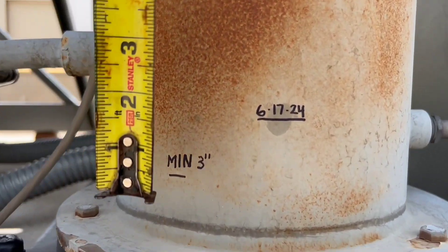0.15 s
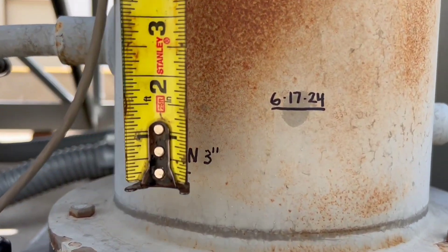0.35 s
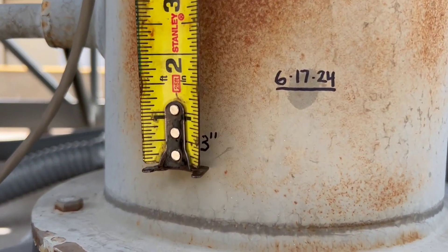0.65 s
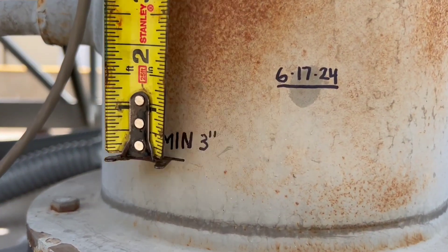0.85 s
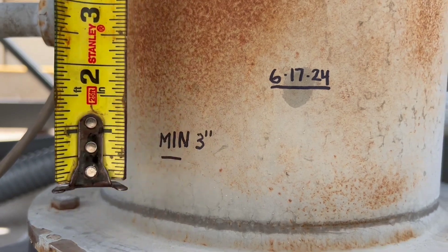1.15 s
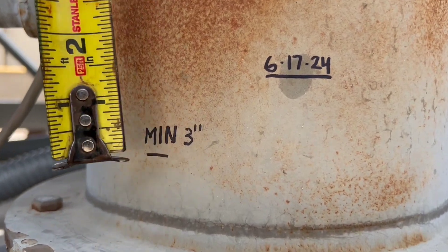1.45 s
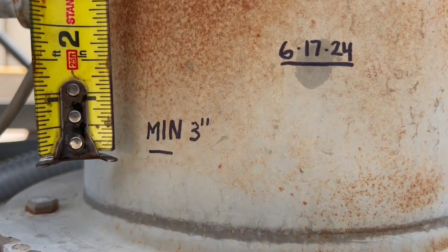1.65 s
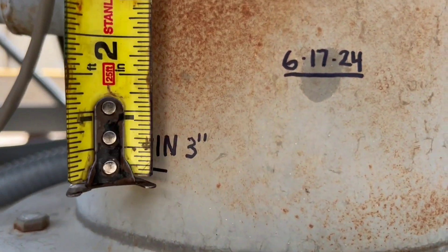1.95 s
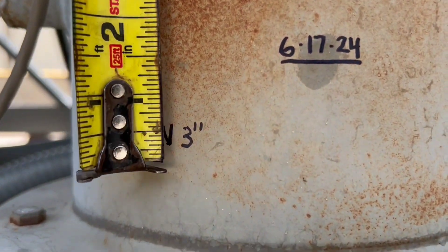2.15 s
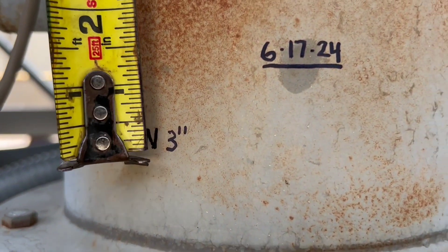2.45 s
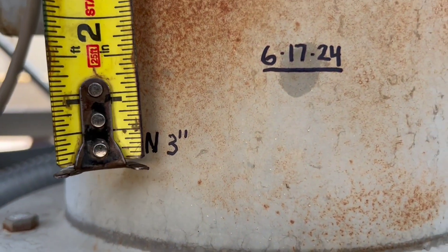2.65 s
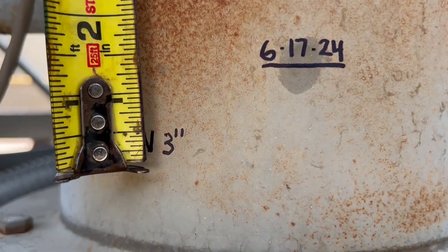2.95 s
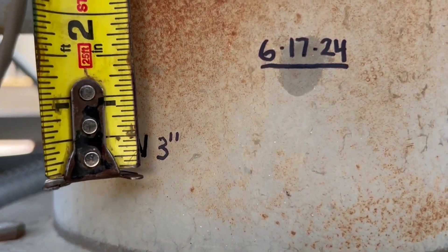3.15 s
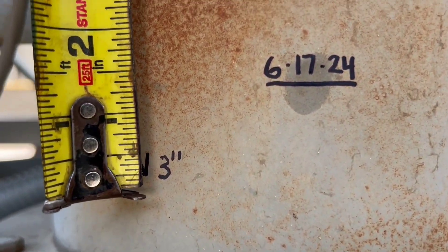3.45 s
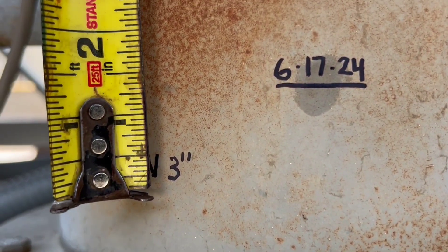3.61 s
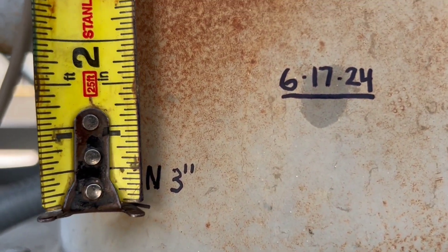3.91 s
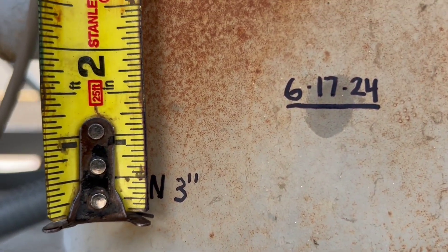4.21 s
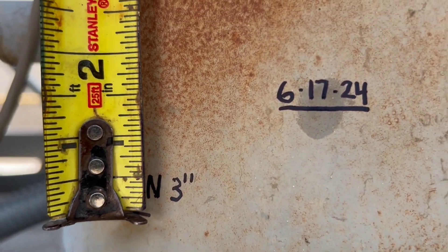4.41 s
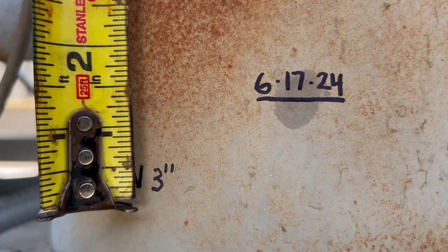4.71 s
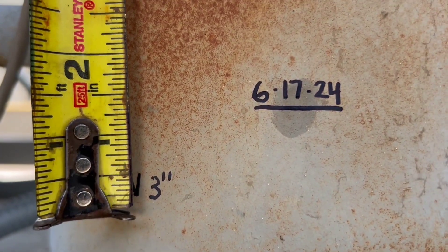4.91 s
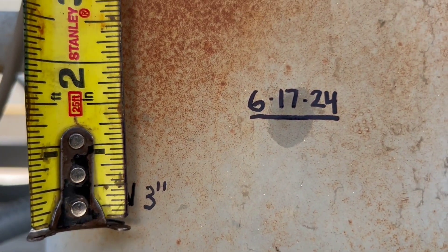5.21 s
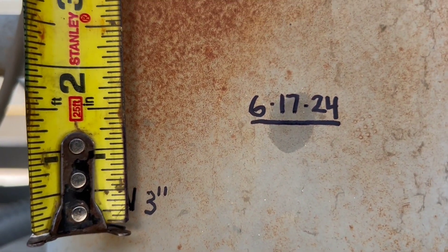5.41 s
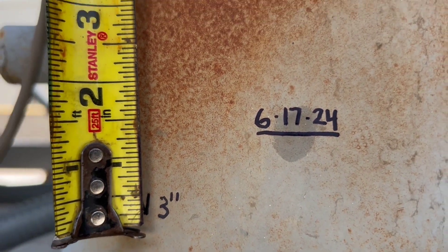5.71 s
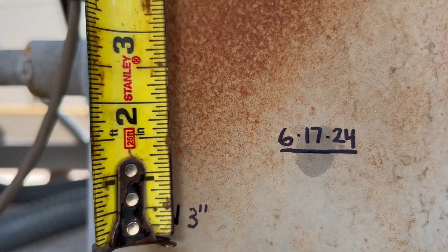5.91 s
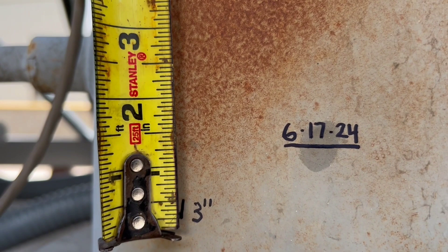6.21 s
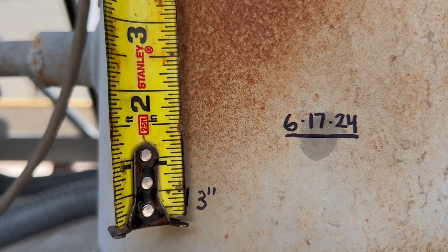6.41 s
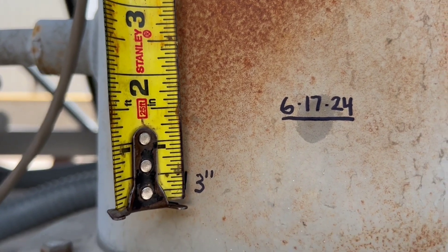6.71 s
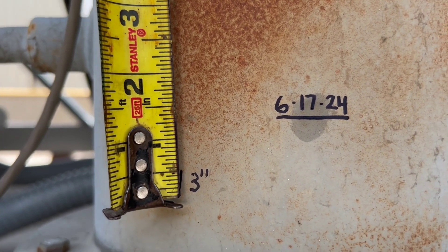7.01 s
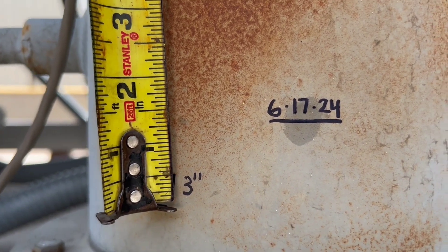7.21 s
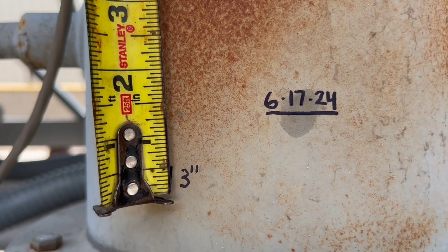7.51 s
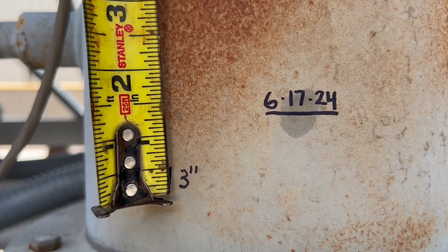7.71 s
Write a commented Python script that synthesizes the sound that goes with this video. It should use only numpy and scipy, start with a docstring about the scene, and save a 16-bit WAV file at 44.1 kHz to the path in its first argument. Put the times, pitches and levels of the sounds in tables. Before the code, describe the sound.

Large chiller compressors whine steadily over a loud fan hum, a low roar of air and a faint gas hiss.

```python
"""An air-cooled chiller on a roof, heard from a hand-held phone close to its oil separator.
From the start, condenser fans hum and push a roar of air, gas hisses in the pipes, motors add mains
lines, and four screw compressors whine on their lobe rate, beating against each other. As the phone
moves in, the whine gains a bright harmonic by 2 s and a rush just under 2 kHz opens up. The phone is
closest at 4.2 s, then draws back; the hiss crests near 5 s and the machines run on to the end."""
import sys
import numpy as np
from scipy import signal
from scipy.fft import rfft, irfft, next_fast_len
from scipy.io import wavfile
from scipy.ndimage import uniform_filter1d

SR = 44100
rng = np.random.default_rng(int(sys.argv[2]) if len(sys.argv) > 2 else 0)


def generate_wav(sig):
    """Save sig (samples, or channels by samples) to the path in sys.argv[1] as 16-bit PCM at SR."""
    pcm = np.round(np.clip(np.atleast_2d(sig).T, -1, 1) * 32767).astype(np.int16)
    wavfile.write(sys.argv[1], SR, pcm)


N = 346273
STEP = 441  # samples per control point
SIZE = next_fast_len(N + SR // 2) // STEP * STEP + STEP
SLOW_T = np.arange(SIZE // STEP) * STEP / SR
EARS = np.array([[1], [-1]])  # left, right
FLARE_S, QUICK_FLARE_S, DROPOUT_S = 0.063, 0.032, 0.014  # half widths of level bumps


def undb(db):
    """Decibels to gain."""
    return 10 ** (np.asarray(db) / 20)


def drift(rate):
    """Smooth random motion of spread 1, turning about rate times a second."""
    span = max(int(SR / STEP / rate), 1)
    motion = rng.standard_normal(len(SLOW_T))
    for _ in range(2):
        motion = uniform_filter1d(motion, span, mode="wrap")
    return (motion - motion.mean()) / motion.std()


def curve(rows):
    """An automation line through (seconds, value) points."""
    return np.interp(SLOW_T, *np.transpose(rows))


def bumps(rows, width_s=FLARE_S):
    """A smooth swell or dip at each (seconds, dB) point."""
    times, db = np.transpose(rows)
    return np.exp(-.5 * ((SLOW_T[:, None] - times) / width_s) ** 2) @ db


def add_tone(spectrum, hz, db, pan_db, lead, phase):
    """Mix in a moving tone: db is rms, pan_db is left minus right, lead is the left's phase lead."""
    centre = int(round(hz * SIZE / SR))
    phase = phase + 2 * np.pi * (hz - centre * SR / SIZE) * SLOW_T
    envelope = undb(db + EARS * pan_db / 2) * np.exp(1j * (phase + EARS * lead / 2))
    sidebands = np.fft.fftshift(np.fft.fft(envelope), axes=1) * STEP / np.sqrt(2)
    first = centre - len(SLOW_T) // 2
    spectrum[:, first:first + len(SLOW_T)] += sidebands


def ride_fader(spectrum, gain):
    """Play a spectrum under a moving gain."""
    return irfft(spectrum, SIZE)[:, :N] * np.interp(np.arange(N) / SR, SLOW_T, gain)


# Stereo image at the two microphone ports. Each row: frequency in Hz, pan in dB, likeness from 0 to 1,
# left lead in radians.
PORT_IMAGE = [(45, -.7, .96, 0), (175, -1.8, .9, -.3), (280, -.8, .63, -.45), (450, -1, .45, -.8),
              (700, -.9, .33, -2.4), (1100, -1.4, .23, -3.3), (1630, -4, .15, -3.3), (1670, 4, .57, -5.8),
              (2300, 1, .5, -5.8), (3000, 1.2, .52, -5.6), (4000, 3.3, .15, -5.9), (5000, 3, .36, -5.9),
              (5800, 2.8, .3, -7.1), (7000, .3, .8, -6.3), (8400, 0, .7, -7.8), (9400, 0, .97, -9.3),
              (10500, 0, .97, -9.55), (11400, 0, .6, -11), (12300, 0, .97, -12.45), (13600, 0, .97, -12.7),
              (14400, 0, .55, -14.4), (15300, 0, .97, -15.7)]
def port_noise(hz):
    """A stereo noise spectrum: a shared part reaches both ports, the rest differs."""
    points_hz, *columns = np.transpose(PORT_IMAGE)
    pan_db, likeness, lead = (np.interp(np.log(hz), np.log(points_hz), c) for c in columns)
    shared, apart = rfft(rng.standard_normal((2, SIZE)))
    pair = np.sqrt(1 + likeness) * shared + EARS * np.sqrt(1 - likeness) * apart
    return pair * np.exp(.5j * EARS * lead) * undb(EARS * pan_db / 2)


# Tone colour of the air and gas. Each row: frequency in Hz, relative noise density in dB.
ROAR_COLOUR = [(25, -34), (44, -9.5), (70, -5.5), (110, 2), (176, 0.5), (225, -3), (350, -4), (700, -9),
               (1000, -13), (1600, -13.5), (1750, -19), (2400, -23), (5000, -30.5), (6500, -37.5),
               (9000, -40), (15500, -47.5)]
# Gas hiss in the pipes. Each row: time in seconds, lift of the top two octave bands in dB.
HISS_LIFT = [(0, 4), (1.5, 3), (3, 2.7), (4, 3.5), (5.2, 5.5), (6.3, 5), (7.2, 3), (7.85, 4.5)]
# The rush that opens as the phone nears. Each row: time in seconds, cut or boost in dB.
RUSH_EQ = [(0, -7), (1.5, -5), (2.5, -2), (3.5, 0.5), (5.5, 0), (6.5, -4.5), (7.85, 0)]
def air_and_gas(level_db=-25.5, rush_hz=1780, rush_half_octaves=0.53):
    """The noise bed: fan air swelling gently in octave bands, gas hiss on top, a rush in the mids."""
    hz = np.maximum(np.arange(SIZE // 2 + 1) * SR / SIZE, 1)
    colour_hz, colour_db = np.transpose(ROAR_COLOUR)
    noise = port_noise(hz) * undb(np.interp(np.log(hz), np.log(colour_hz), colour_db))
    octave = np.clip(np.log2(hz), 5, 14)
    bed, gust = 0, drift(1.0)
    for centre in range(5, 15):  # 32 Hz to 16 kHz
        band = np.cos(np.pi / 2 * np.clip(octave - centre, -1, 1)) ** 2
        db = 0.04 * gust + 1.06 * drift(2.5) + 0.5 * drift(11) + (centre >= 13) * curve(HISS_LIFT)
        bed += ride_fader(noise * band, undb(db))
    rush_band = np.cos(np.pi / 2 * np.clip(np.log2(hz / rush_hz) / rush_half_octaves, -1, 1)) ** 2
    bed += ride_fader(noise * rush_band, undb(curve(RUSH_EQ)) - 1)  # a bell EQ on the bed
    return bed * undb(level_db) / np.sqrt(np.mean(bed ** 2))


# Condenser fans. Each row: blade rate in Hz, level in dB, time in seconds when it is in step with the
# first fan, then the same level and time for its octave.
FAN_HUMS = [(57.625, -32.4, 0, -47.5, 0), (56.75, -43, .128, -48.4, .548), (56.909, -48, .021, -43.1, .319),
            (57.04, -40.6, .355, -53.9, .168), (57.227, -43.9, 1.115, -42.5, .478),
            (57.444, -35.3, 5.412, -42, 2.196), (57.745, -42, .664, -38, 1.013)]
# Brief flares and dips, one list each for lobe harmonics 4, 5, 8 and 10, the blade rate and its third
# harmonic. Each row: time in seconds, change in dB.
TONE_FLARES = [
    [(.17, -5), (3.05, 3), (4.1, 2), (5.22, -4.5), (6.25, -4.5), (.5, -8), (.68, -4), (1.0, 0), (1.55, 4.5),
     (2.1, 1.5), (2.27, -1), (3.82, -2), (4.33, -3), (4.6, -7), (5.1, -1), (5.62, -4), (6.38, 4), (6.5, -8),
     (6.68, -3), (7.0, 2.5), (7.35, 0), (7.75, 9.5)],
    [(.85, 4), (2.0, 8.5), (2.25, 4.5), (2.8, 7), (3.3, 5), (3.5, 11), (4.3, 3), (4.65, 1), (4.8, 4.5),
     (5.36, 7), (5.65, -1), (5.95, 2.5), (6.52, 4), (7.0, 5)],
    [(.06, 6), (.22, -17), (.36, 4), (.56, 4), (.67, 3), (1.05, 9), (1.15, 12), (1.24, 3), (1.45, 7),
     (1.55, 0), (1.85, 8), (2.98, 4), (3.06, 8), (3.15, 13), (3.32, 9), (3.52, 3), (3.85, -8), (4.1, 8),
     (4.38, 8), (4.53, 4), (4.96, 8), (5.18, 1), (5.37, -5), (5.52, 5), (5.6, 8.5), (5.85, 4), (5.93, 5),
     (6.8, 7), (6.94, 8), (7.6, 7), (7.75, 8)],
    [(.9, 2), (1.86, 3), (2.6, 2), (3.1, 1), (4.0, 5), (4.52, 9), (5.85, 10), (6.72, 6), (7.14, 5),
     (7.24, 8), (7.8, 5.5)],
    [(.1, -3), (.83, -1), (1.1, 4.5), (1.3, 2.5), (2.05, -16), (2.2, 4), (2.65, 2), (3.25, 1.5), (3.6, 2.5),
     (4.26, -19), (4.9, 7.5), (6.4, 2), (6.6, -4), (7.45, -4), (7.6, 8), (7.75, 8.5)],
    [(.5, 5.5), (1.45, 6), (1.75, 7), (2.3, 8.5), (2.9, 6), (5.45, 7), (6.88, 7), (7.3, 0), (7.62, 9),
     (7.85, 12)],
]
def fans(spectrum):
    """Fans at slightly different speeds beat; turbulence makes the higher harmonics ragged."""
    first_hz = FAN_HUMS[0][0]
    blade_flare, third_flare = map(bumps, TONE_FLARES[4:])
    wander, swirl = 0.32 * drift(0.66), .5 * drift(1.35)
    for hz, db, step_s, octave_db, octave_s in FAN_HUMS:
        beat = 2 * np.pi * (hz - first_hz)
        add_tone(spectrum, hz, db + blade_flare, -1, -.05, wander - beat * step_s)
        add_tone(spectrum, 2 * hz, octave_db, -1.3, -.1, 2 * (wander - beat * octave_s) + swirl)
        add_tone(spectrum, 5 * hz, -63, -1.5, -.4, rng.uniform(0, 2 * np.pi) + 2 * swirl)
    for harmonic, db in ((3, -39.5 + third_flare), (4, -46.5)):
        add_tone(spectrum, harmonic * first_hz, db + 3 * drift(8), -1, -.3,
                 harmonic * wander + 1.38 * drift(8))


# Mains hum and its sidebands on the lobe tones. Each row: pitch in Hz, level in dB, pan in dB,
# left lead in radians.
MAINS_LINES = [(60.0, -42.0, -1.0, 0.0), (179.7, -48.0, -4.0, -0.3), (418.9, -43.0, -4.0, -0.5),
               (469.7, -46.0, -4.0, 1.0), (709.6, -43.0, -3.0, 0.7), (872.4, -49.0, 5.0, 3.0),
               (1593.8, -42.0, -4.0, -2.6), (1888.9, -52.0, 3.0, 0.7), (2008.3, -56.5, 9.0, 0.5),
               (2183.6, -58.0, 1.0, 0.7), (2997.2, -65.0, 2.0, 0.3), (3291.2, -62.0, 8.0, -0.1),
               (3651.2, -62.0, 5.0, -1.3), (6603.0, -71.0, 0.0, 0.1)]
# One sideband swells and sinks. Each row: time in seconds, change in dB.
SIDEBAND_RIDE = [(.05, 4), (.3, -4), (.7, -4), (1.85, 4), (1.97, 4), (2.17, -7), (2.65, -4), (3.25, 5),
                 (3.4, 5), (3.62, -3), (3.85, 5), (4.27, 5), (4.5, 1), (5.0, -5), (5.7, 4), (7.05, -5),
                 (7.5, -5)]
# Faint tones beside the lobe tones. Each row: pitch in Hz, level in dB.
FAINT_TONES = [(287.5, -47), (315.5, -48), (581.5, -51), (617, -53), (1733.5, -62), (2990, -62),
               (3675, -68), (4340, -68)]
def motors(spectrum, swelling_hz=709.6):
    """Steady lines tied to the mains, and a few faint tones beside them."""
    for hz, db, pan_db, lead in MAINS_LINES:
        db = db + (hz == swelling_hz) * bumps(SIDEBAND_RIDE) + 0.3 * drift(2.8) + 0.39 * drift(8.7)
        pan_db = pan_db + 0.59 * drift(0.86)
        add_tone(spectrum, hz, db, pan_db, lead, rng.uniform(0, 2 * np.pi) + 0.29 * drift(0.79))
    for hz, db in FAINT_TONES:
        add_tone(spectrum, hz, db + 2 * drift(1.4), -1, 0, rng.uniform(0, 2 * np.pi) + .5 * drift(0.72))


def air_scatter(depth):
    """Moving air between casing and phone scatters a tone: flutter in dB, phase slip in radians."""
    share = min(depth / 55, .85)
    eddies = [.8 * drift(30) + .6 * drift(100) for _ in range(2)]
    path = (1 + share * (eddies[0] + 1j * eddies[1])) / np.sqrt(1 + 2 * share ** 2)
    return 20 * np.log10(np.abs(path)), np.angle(path)


# The phone moves in, then back. Each row: time in seconds, distance beyond its closest spot in metres.
HAND_PATH = [(0, .3), (.52, .19), (1.57, .09), (2.6, .04), (4.2, 0), (5.75, .045), (7.85, .185)]
def hand_delay(share):
    """Extra seconds the sound travels to the moving phone; the change bends the pitch a little."""
    return share * curve(HAND_PATH) / 343


# The compressors, nearest first. Each row: shaft speed in Hz, casing tone trim in dB, casing tone pan
# in dB, factor on the phone's travel towards it.
MACHINES = [(58.958, -2.5, 0, 1), (58.875, -8, -1, 1.25), (58.817, -11, 2, .53), (58.742, -13, 0, .86)]
# Casing tones. Each row: shaft order, level before trim in dB, pan in dB, left lead in radians.
CASING_ORDERS = [(9.0, -43.5, 3.0, -2.2), (11.0, -45.0, 0.0, -2.4), (12.0, -52.0, -2.0, 0.7),
                 (15.0, -40.5, -2.0, 2.8), (19.0, -51.0, 0.0, 1.6), (21.0, -50.0, -1.0, 0.7),
                 (26.0, -46.0, -3.0, 1.9), (28.0, -45.0, 4.0, -0.4), (31.0, -51.0, 9.0, 0.7),
                 (35.0, -50.0, 9.0, 0.3), (45.0, -55.0, 2.0, 0.8), (55.0, -55.5, 1.0, 1.2),
                 (60.0, -56.0, 0.0, 1.5), (65.0, -58.0, 2.0, 1.3), (70.0, -59.5, 2.0, -0.1),
                 (75.0, -58.0, 4.0, -0.4), (80.0, -62.5, 3.0, 0.2), (85.0, -63.0, 5.0, 1.3),
                 (90.0, -68.0, 7.0, -0.3), (95.0, -69.0, 3.0, -1.5), (105.0, -67.0, 6.0, -0.5),
                 (110.0, -70.0, 2.0, 0.0), (125.0, -72.0, -1.0, -0.2)]
# Slight unbalance: a list of shaft orders, level before trim at order 20 in dB, tilt in dB per octave.
UNBALANCE_ORDERS = ([13, 14, 16, 17, 18, 29, 33, 36, 38, 39, 46, 48, 49, 69, 72, 73, 76, 100, 102, 115],
                    -57, -5)
# One high casing tone glints. Each row: time in seconds, lift in dB.
CASING_GLINTS = [(3.13, 8.4), (3.38, 9.6)]
def casing_tones(spectrum, glint_order=75):
    """Weaker compressor tones: each shaft wanders in angle, which shows most on the high orders."""
    wanders = [0.0034 * drift(0.5) + 0.0024 * drift(8) for _ in MACHINES]
    orders, base_db, tilt_db = UNBALANCE_ORDERS
    unbalance = [(order, base_db + tilt_db * np.log2(order / 20), 0, .5) for order in orders]
    for order, db, pan_db, lead in CASING_ORDERS + unbalance:
        db = db + (order == glint_order) * bumps(CASING_GLINTS, QUICK_FLARE_S)
        for (shaft_hz, trim_db, side_db, share), wander in zip(MACHINES, wanders):
            turns = wander - shaft_hz * hand_delay(share)
            start = rng.uniform(0, 2 * np.pi)
            lead_shift = 0.052 * trim_db * rng.standard_normal()
            flutter_db, slip = air_scatter(order)
            # reflections off the pipework shift as the hand moves
            fade_db = 2.3 * drift(0.9) + min(.05 * order, 2.5) * drift(10)
            add_tone(spectrum, order * shaft_hz, db + trim_db + fade_db + flutter_db,
                     pan_db + side_db + 2.5 * drift(0.58), lead + lead_shift,
                     start + slip + 2 * np.pi * order * turns)


# The whine, five lobes to a shaft turn. Each row: shaft order, compressor index, level in dB, pan in dB,
# left lead in radians, time in seconds when it is in step with the nearest compressor.
LOBE_HARMONICS = [(5, 0, -25.9, -1.9, 1.1, 0), (5, 1, -44, 3.6, -.1, 1.546), (5, 3, -46, 3.1, -1.9, .459),
                  (10, 0, -30, -10, 1.1, 0), (10, 1, -47.5, 3.1, 2.5, .738), (10, 2, -41, 5, 2.7, .19),
                  (10, 3, -43.5, 4.5, .2, .232), (20, 0, -45.5, -.6, 1.1, 0),
                  (20, 1, -36.3, -4.8, -.1, .345), (20, 2, -46, -7.1, .4, .166),
                  (20, 3, -48.5, -9.4, -2.8, .075), (25, 0, -44, -3, .1, 0), (25, 1, -55, 6, -.7, .338),
                  (25, 2, -50.5, -7.3, -1.6, .215), (30, 0, -47.5, 12.5, .5, 0), (40, 0, -47.3, .7, -.2, 0),
                  (40, 2, -59, 0, 0, 0), (40, 3, -58, 2, 0, .06), (50, 0, -51.5, 1.2, .7, 0),
                  (50, 1, -62, 2, .7, 0), (50, 3, -63, 1, .7, 0)]
# The nearest compressor's 2nd and 6th lobe harmonics swell and dip with the phone's position.
# Each row: time in seconds, change in dB.
SECOND_RIDE = [(0, -34), (.35, -5.5), (.7, 0), (.95, -5.5), (1.3, -17), (1.55, -0.5), (2, 2.5), (2.5, 2),
               (2.72, -5), (2.95, 2), (3.5, 4), (4, 2.5), (4.15, -2), (4.3, 2.5), (4.6, 3), (5.42, 3),
               (5.56, 0), (5.75, -0.5), (6.35, 3.5), (6.5, -5.5), (6.7, -2.5), (7.0, -3.5), (7.3, 2),
               (7.85, 1.5)]
SIXTH_RIDE = [(0, -15), (1, -23), (1.9, 3), (6.5, 3), (6.75, -8), (7.2, 2), (7.85, 3)]
# Split-second dips, listed by shaft order. Each row: time in seconds, change in dB.
LOBE_DROPOUTS = {5: [(.13, -3), (.56, -6), (.68, -8), (.92, -4), (2.1, -5), (2.22, -4), (2.77, 2.5),
                 (6.38, -2), (7.33, -1)], 10: [(2.43, -7), (2.68, -8), (5.48, -5), (5.6, -10)],
                 20: [(.41, -16), (.52, -4), (.72, -6), (.95, -11), (1.37, -5), (2.26, -17), (2.94, -3),
                 (3.58, -7), (3.81, -26), (5.66, -3), (6.06, -8), (6.67, -4)]}
def screw_whine(spectrum):
    """The main voice: lobe harmonics of screw compressors that beat at slightly different speeds."""
    widths = (FLARE_S, FLARE_S, QUICK_FLARE_S, QUICK_FLARE_S)
    flares = dict(zip((20, 25, 40, 50), map(bumps, TONE_FLARES, widths)))
    dips = {order: bumps(rows, DROPOUT_S) for order, rows in LOBE_DROPOUTS.items()}
    rides = {10: curve(SECOND_RIDE), 30: curve(SIXTH_RIDE)}
    wander = 0.0021 * drift(8)
    motion = {}  # level and phase, shared by all compressors on one order
    for order in sorted({row[0] for row in LOBE_HARMONICS}):
        flutter_db, slip = air_scatter(order * min(order, 32, 1000 / order) / 50)
        # the fundamental wavers; high harmonics fade at random
        depth_db = .8 if order == 5 else .05 * np.clip(order - 14, 0, 14)
        motion[order] = flutter_db + depth_db * drift(20), slip + rng.uniform(0, 2 * np.pi)
    for order, machine, db, pan_db, lead, step_s in LOBE_HARMONICS:
        shaft_hz, _, _, share = MACHINES[machine]
        waver_db, phase = motion[order]
        db = db + waver_db + flares.get(order, 0) + dips.get(order, 0)
        if machine == 0:
            db += rides.get(order, 0)
        turns = wander - (shaft_hz - MACHINES[0][0]) * step_s - shaft_hz * hand_delay(share)
        add_tone(spectrum, order * shaft_hz, db, pan_db + 1.2 * drift(1.7),
                 lead + 0.017 * order * drift(1.3), phase + 2 * np.pi * order * turns)


def scene():
    """Lay the machine tones over the bed of air and gas."""
    spectrum = np.zeros((2, SIZE // 2 + 1), complex)
    for source in (screw_whine, casing_tones, motors, fans):
        source(spectrum)
    return irfft(spectrum, SIZE)[:, :N] + air_and_gas()


def record(dry):
    """The phone cuts the top above 15.7 kHz; a mirrored lead-in lets its filter settle."""
    lowpass = signal.ellip(14, .2, 90, 15700, fs=SR, output="sos")
    lead_in = 2 * dry[:, :1] - dry[:, STEP:0:-1]
    return signal.sosfilt(lowpass, np.concatenate([lead_in, dry], axis=1))[:, STEP:]


dry = scene()
out = record(dry)
generate_wav(out)
```